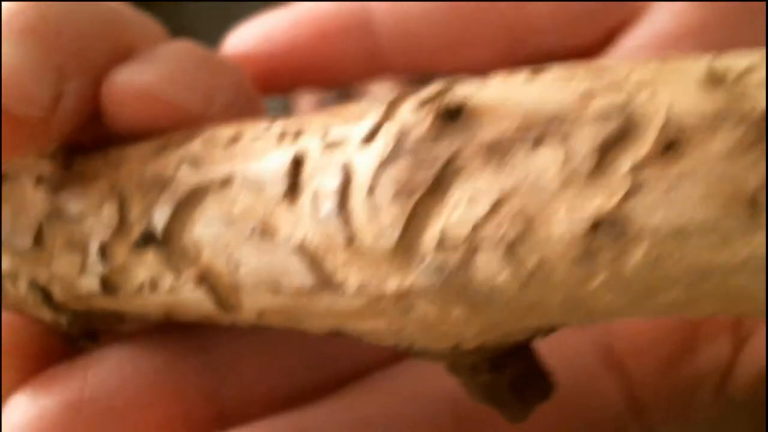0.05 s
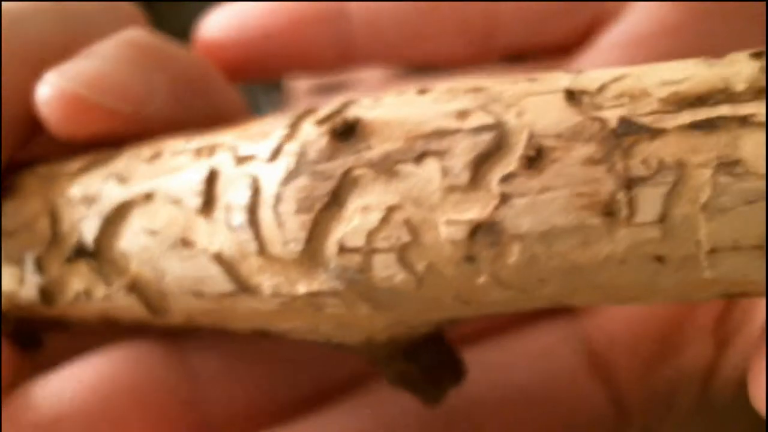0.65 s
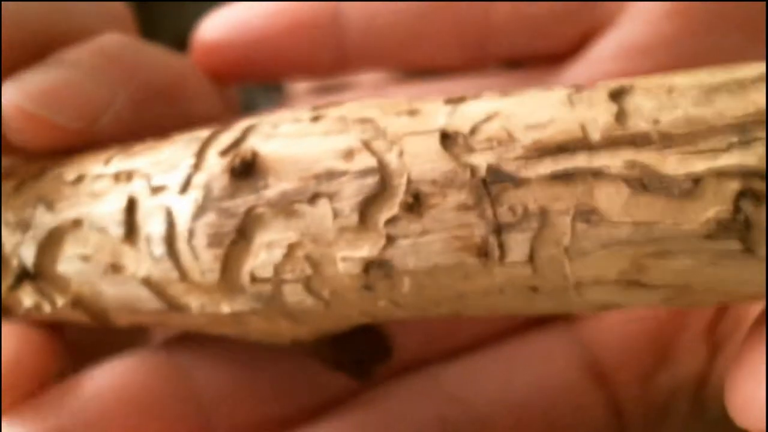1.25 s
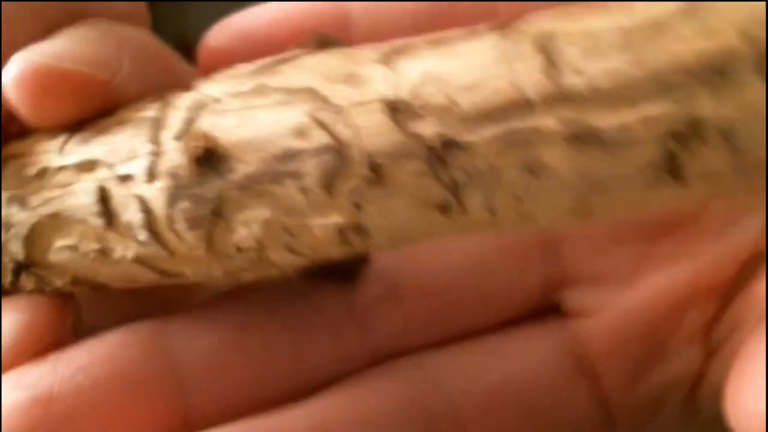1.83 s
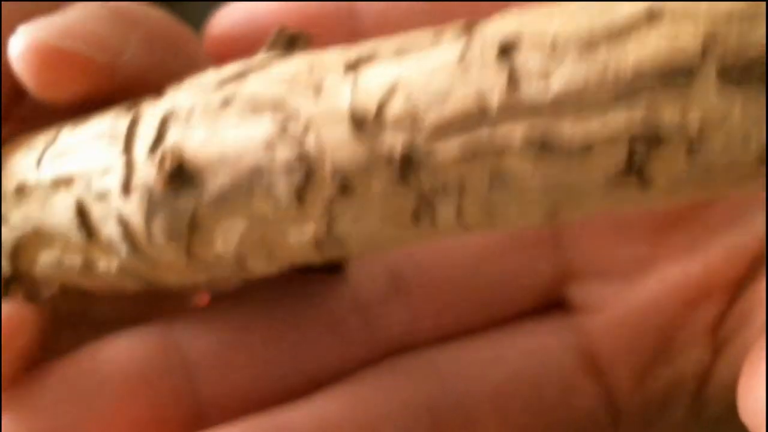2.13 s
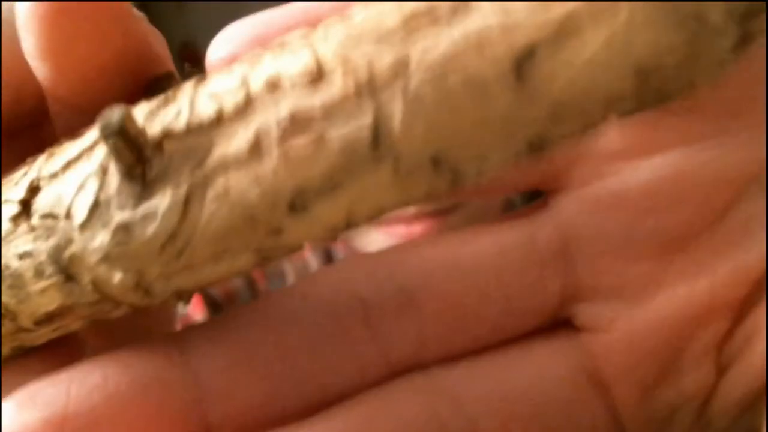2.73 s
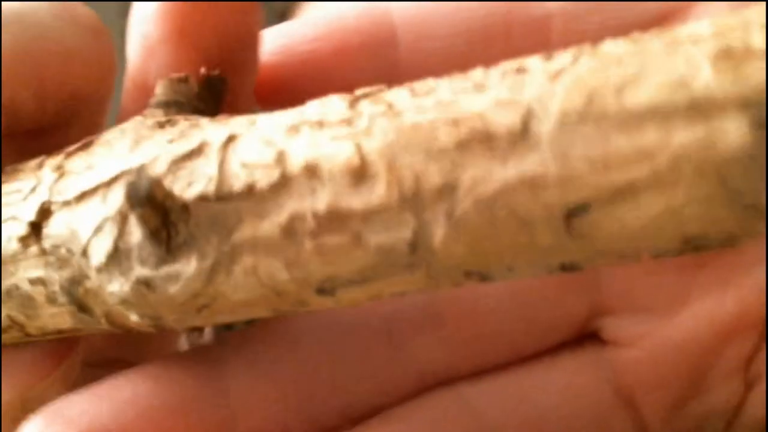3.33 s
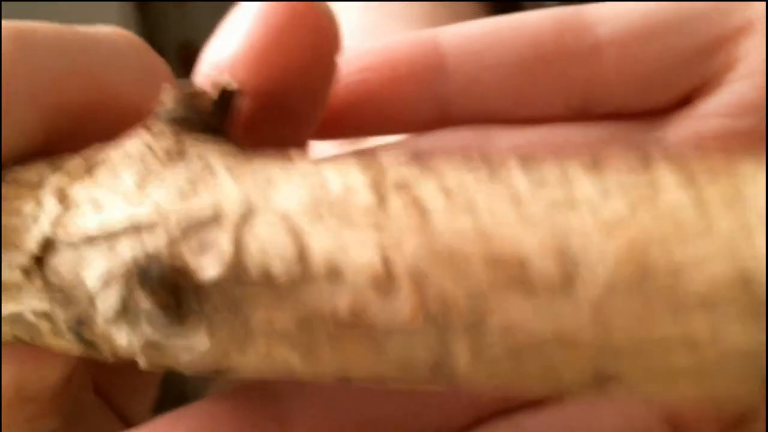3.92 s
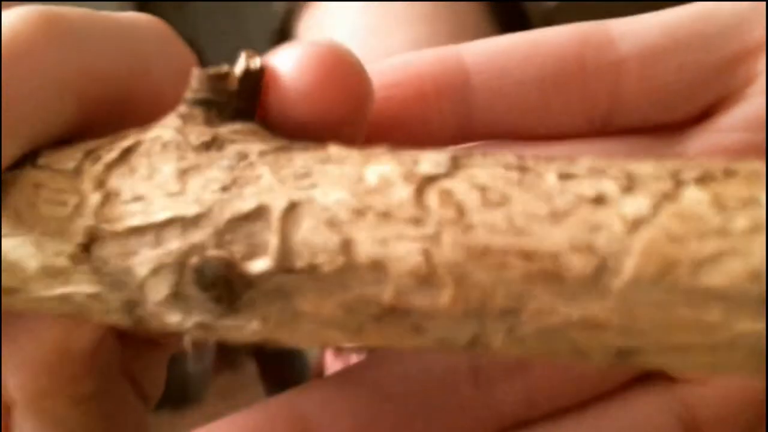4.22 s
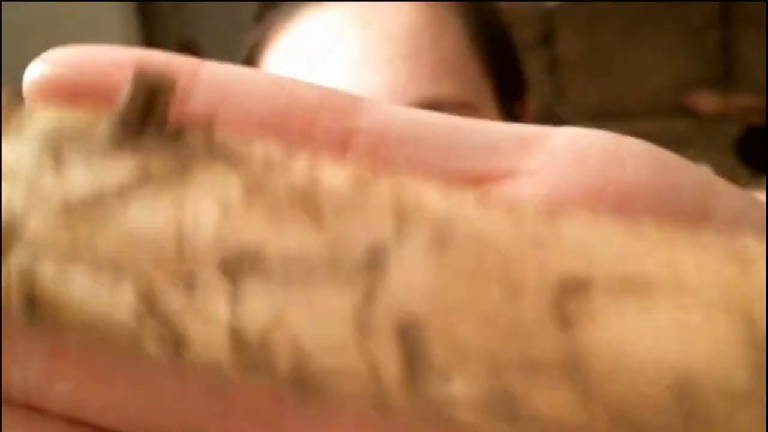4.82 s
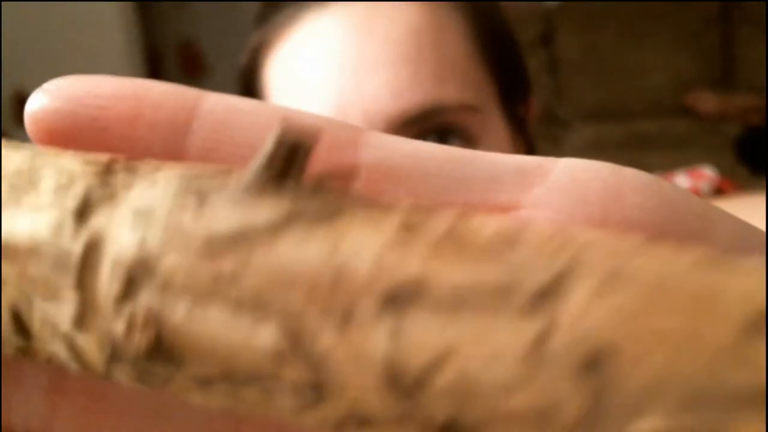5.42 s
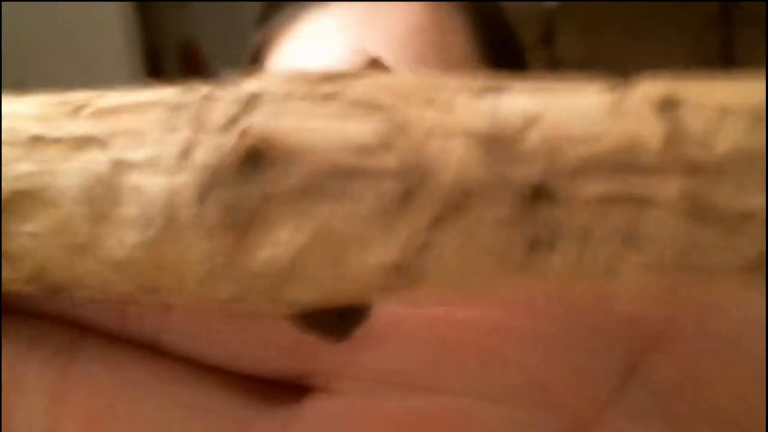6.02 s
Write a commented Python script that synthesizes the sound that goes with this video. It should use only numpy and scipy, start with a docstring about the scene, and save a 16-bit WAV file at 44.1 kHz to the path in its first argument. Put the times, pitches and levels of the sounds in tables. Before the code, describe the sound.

Hands turn a dry, weathered stick close to the microphone in a quiet room. Skin slides over the wood in faint, short, scratchy strokes, with soft finger bumps and barely audible squeaks. Two splinters snap near the start. A little before halfway comes one sharp, hollow knock. More tiny ticks follow, a fingernail briefly scrapes the grain, and a few firmer rubs finish over a low room hum.

```python
"""Hands turn a dry, weathered stick close to the microphone in a quiet room. From the start, sliding skin
hisses in short strokes and its friction rings the wood near 4 and 6 kHz, among soft finger bumps and runs of
faint stick-slip squeaks. Two splinters snap at about 0.5 s. At 2.6 s one sharp knock excites the modes of a
hollow body. More splinters tick as the turning goes on, a nail scrapes over the grain at 5.4 s, clicking as it
bites, and a few firm strokes end the scene."""
import sys
import numpy as np
from scipy import signal
from scipy.fft import rfft, irfft, next_fast_len
from scipy.io import wavfile

SR = 44100
rng = np.random.default_rng(int(sys.argv[2]) if len(sys.argv) > 2 else 0)


def unload_audio(sound):
    """Save the sound as a 16-bit wav file, at the path given as the first command line argument."""
    columns = np.transpose(np.atleast_2d(sound))
    # keep every value between -1 and 1, then stretch to whole-number steps
    steps = np.round(np.clip(columns, -1, 1) * 32767)
    wavfile.write(sys.argv[1], SR, steps.astype(np.int16))


N = 271656
T = np.arange(N) / SR

# wood resonances driven by sliding: (frequency [Hz], bandwidth [Hz], relative level [dB])
MAIN_RESONANCES = [(4021, 138, 1), (4220, 1500, -20)]
UPPER_RESONANCES = [(5650, 590, -8), (6284, 200, 7)]
LOW_RESONANCE = [(2250, 230, 0)]
# spectrum of the skin hiss: (frequency [Hz], relative density [dB])
HISS_SPECTRUM = [(3100, -6), (4600, -11), (7500, 9), (10200, 14), (11400, 3), (12800, -12), (15500, -26)]
def sliding():
    """Forced vibration: part of the skin's friction drives the wood's resonances, part radiates as hiss."""
    main, upper, hiss = stroke_gains()
    rub = friction(slips_per_s=5700, grain_db=4.5, patchy_db=1.5, smooth=1.0)
    grit = friction(slips_per_s=2500, grain_db=3.5, patchy_db=1.5, smooth=1.0)
    wood = from_db(-0.56) * main * resonate(rub, MAIN_RESONANCES)
    wood += from_db(-1.0) * upper * resonate(rub, UPPER_RESONANCES)
    wood += (from_db(-91.5) + from_db(-21.5) * upper) * resonate(rub, LOW_RESONANCE)
    firmness = np.cbrt(main * upper * hiss)   # a firm stroke also rasps between main and upper ring
    rasp = from_db(-10.0) * firmness * rms_one(band(grit, low_hz=3900, high_hz=5900))
    return wood + rasp + from_db(-3.0) * hiss * coloured(grit, HISS_SPECTRUM)


# strokes of skin: (start [s], length [s], main ring drive [dB], upper ring drive [dB], hiss drive [dB])
SKIN_STROKES = [ (0.134, 0.13, -73.5, -83.5, -85), (0.368, 0.038, -48.5, -61, -73),
                (0.409, 0.086, -53.5, -62.5, -69.5), (0.499, 0.052, -49.5, -56.5, -61.5),
                (0.776, 0.028, -69.5, -86, -88), (1.004, 0.053, -66.5, -68, -66),
                (1.057, 0.03, -72, -60.5, -67.5), (1.168, 0.04, -66.5, -62, -75),
                (1.257, .045, -64, -63.5, -74), (1.335, 0.071, -92, -80, -87), (1.603, 0.14, -62, -67, -77),
                (1.713, 0.12, -59, -56, -59.5), (1.837, 0.059, -52.5, -56.5, -58.5),
                (1.912, 0.055, -53, -60, -63.5), (1.969, 0.15, -62, -86, -82),
                (2.755, 0.056, -68.5, -85, -78), (2.818, .055, -86, -83, -69),
                (3.096, 0.059, -64.5, -94, -80), (3.192, 0.089, -64.5, -79, -64.5),
                (3.595, .11, -75, -81, -74), (3.993, 0.034, -74, -89, -67), (4.038, 0.031, -71.5, -81, -65),
                (4.089, 0.044, -63.5, -66.5, -60), (4.135, .04, -80, -70.5, -62),
                (4.798, 0.036, -56.5, -65.5, -72), (4.88, 0.29, -78, -79, -78.5),
                (4.983, 0.019, -62.5, -73, -86), (5.467, 0.072, -70, -90, -93),
                (5.798, 0.036, -68, -76, -80), (5.84, 0.042, -58, -60, -74),
                (5.907, 0.075, -61.5, -62.5, -67), (6.04, .12, -58, -61, -56)]
def stroke_gains():
    """Incoherent addition: overlapping strokes sum in power, for main ring, upper ring and hiss alike."""
    shapes = np.array([stroke(start, length) for start, length, *_ in SKIN_STROKES])
    gains = from_db([row[2:] for row in SKIN_STROKES])
    resting = from_db([-90.5, -94, -94])[:, None]   # the hands never quite rest
    catching = from_db(1.52 * drift(per_s=50))   # the dry surface catches unevenly
    return np.sqrt(gains.T ** 2 @ shapes ** 2 + resting ** 2) * catching


GRIP_S = 0.023   # rise time of a contact
def stroke(start, length, arch_db=1.5, release_t60=0.11):
    """Friction follows normal force: the finger takes hold, presses hardest midway, then lifts."""
    pressure = np.sin(np.pi * np.clip((T - start) / (length + GRIP_S), 0, 1))
    release = np.exp(-np.log(1000) * np.clip((T - start - length) / release_t60, 0, 10))
    return take_hold(start) * from_db(arch_db * (pressure - 1)) * release


def take_hold(start):
    """Gradual onset of contact: first a graze, then the full grip."""
    return .5 + .5 * np.tanh(2 * (T - start) / GRIP_S - 1)


KNOCK_S = 2.5709
# modes of the hollow body: (frequency [Hz], level [dB], t60 [s])
BODY_MODES = [(116, -46.5, 0.39), (160, -27, 0.13), (232.5, -24.5, 0.23), (315, -26, 0.063),
              (341, -29.5, .22), (423, -33, 0.47), (478, -33, 0.15), (545, -36, 0.39), (665, -33, 0.39),
              (755, -32, 0.25), (744, -39, 0.13), (882, -58, 0.24), (938, -50, .24), (960, -50, 0.42),
              (964, -48, 0.29), (1093, -38, 0.086), (1254, -39, 0.064)]
# its dense ringing tail: (low edge [Hz], high edge [Hz], level [dB], t60 [s], choked after [s])
BODY_TAIL = [(40, 260, -42.5, 0.21, 0.074), (180, 560, -24.5, 0.13, 0.017), (507, 925, -33, 0.41, 0.1),
             (1090, 2330, -47.5, 0.16, 0.068), (2500, 4400, -57, 0.13, .042),
             (4000, 5650, -54.5, 0.1, 0.063)]
def knock():
    """Impulse response of a hollow body: a steep thud, then low modes and their dense tail."""
    blow = impulse(KNOCK_S)
    thud = from_db(-20) * decay(KNOCK_S, t60=0.0013) + from_db(-19.5) * ring(blow, hz=400, t60=0.0064)
    # neighbouring modes swing in opposite directions
    body = sum((-1) ** k * from_db(db) * ring(blow, hz, t60)
               for k, (hz, db, t60) in enumerate(BODY_MODES))
    tail = 0
    for low, high, db, t60, after_s in BODY_TAIL:
        noise = rms_one(band(band(rng.standard_normal(N), low, high), low, high))
        tail += from_db(db) * decay(KNOCK_S, t60) * choke(after_s) * noise
    build_up = 1 - decay(KNOCK_S, t60=0.0048)
    return tail * build_up + body * choke(after_s=0.11) - thud


def choke(after_s):
    """Added damping smothers the knock's ring soon after the blow."""
    return 1 / (1 + (np.maximum(T - KNOCK_S, 0) / after_s) ** 6)


# splinters, and near 5.4 s the clicks of the nail as it bites: (time [s], drive [dB], cutoff [Hz], relative
# ring drive [dB], relative crumbling [dB])
SPLINTERS = [ (0.4311, -37, 7500, -5.5, -9), (0.5243, -22, 15000, -23, -21), (1.1873, -56, 9000, 5, -25),
             (3.3348, -30, 11500, -18, -14), (3.667, -23.5, 14100, -36, -30),
             (3.9758, -44.5, 12600, -24, -14), (4.135, -23.5, 10500, -38, -35),
             (4.1738, -48, 11000, -19, -17), (4.805, -41.5, 7000, 3, -6.5), (5.4018, -34.5, 9000, 6.5, -16),
             (5.42, -40, 8000, -1, -12), (5.8098, -26, 11500, -3, -23), (5.874, -48, 10000, 1, -9.5)]
# wood modes rung by a snap: (frequency [Hz], relative level [dB], t60 [s])
SNAP_MODES = [(2314, -19.5, 0.039), (4050, -16.5, 0.02), (6440, -19, .01)]
# spectrum of the crumbling: (frequency [Hz], relative density [dB])
CRUMB_SPECTRUM = [(2000, -38), (4500, -4.5), (7000, 4.5), (11000, 12.5), (13000, 10), (15500, 4)]
def splinters():
    """Brittle fracture: a splinter snaps in under a millisecond, rings the wood and crumbles briefly; the
    nail's clicks as it bites at 5.4 s sound the same way."""
    cracks, blows = np.zeros((2, N))
    crumbs = coloured(friction(slips_per_s=4000, grain_db=9.0, patchy_db=6.5, smooth=0.4), CRUMB_SPECTRUM)
    for s, db, cutoff_hz, ring_db, tail_db in SPLINTERS:
        snap = from_db(2) * band(band(impulse(s), 5000, 16000), 5000, 16000)
        crumble = crumbs * (from_db(-17) * decay(s, t60=0.0041) + from_db(tail_db) * decay(s, t60=0.062))
        low_pass = signal.butter(6, cutoff_hz, fs=SR, output="sos")
        cracks += from_db(db) * signal.sosfilt(low_pass, snap + crumble + 1e-18)
        blows += from_db(db + ring_db) * impulse(s)
    blows = band(blows, low_hz=1920, high_hz=9000)
    return cracks + sum(from_db(db) * ring(blows, hz, t60) for hz, db, t60 in SNAP_MODES)


# resonances under the nail: (frequency [Hz], bandwidth [Hz], relative level [dB])
NAIL_RESONANCES = [(2210, 82, -9), (3120, 570, -22), (4000, 114, -3.5), (5620, 210, -13.5),
                   (6300, 360, -17.5), (7400, 580, -19), (11000, 1400, -24), (13000, 900, -30)]
def nail_scrape(lands_s=5.364, peak_s=5.42, peak_db=-43, rise_db_per_s=333, fall_db_per_s=320):
    """Broadband excitation: a hard nail bites ever harder, wakes many resonances, then slides off."""
    to_peak_s = peak_s - T
    below_peak_db = np.clip(np.maximum(rise_db_per_s * to_peak_s, -fall_db_per_s * to_peak_s), 0, 200)
    rub = friction(slips_per_s=3800, grain_db=2.0, patchy_db=4.5, smooth=0.6)
    return take_hold(lands_s) * from_db(peak_db - below_peak_db) * resonate(rub, NAIL_RESONANCES)


# firmer bumps of the fingers: (time [s], drive [dB], frequency [Hz])
FIRM_BUMPS = [(0.17, -46, 293), (0.645, -45.5, 312), (1.104, -41.5, 169), (1.303, -43.5, 180),
              (1.503, -42.5, 160), (2.115, -52, 280), (2.202, -46.5, 248), (2.305, -43.5, 262),
              (2.79, -48, 200), (2.967, -43.5, 304), (3.092, -48.5, 202), (3.622, -50.5, 210),
              (3.695, -46.5, 229), (3.755, -47, 238), (4.806, -56, 112)]
def bumps(light_db=-58, low_hz=169, high_hz=320, until_s=4.8):
    """Damped oscillation: soft flesh presses for a few milliseconds and stills the stick within cycles."""
    # lighter bumps fall at random while the fingers walk round the stick
    light = [(when * until_s, light_db, low_hz + pitch * (high_hz - low_hz))
             for when, pitch in rng.random(size=(7, 2))]
    out = 0
    for s, db, hz in FIRM_BUMPS + light:
        envelope = decay(s, t60=0.044) - decay(s, t60=0.0089)
        out += from_db(db) * envelope * np.sin(2 * np.pi * hz * (T - s))
    return out


# runs of squeaks: (start [s], end [s], starting level [dB])
SQUEAK_TRAINS = [(0.032, 0.76, -63.5), (1.494, 1.83, -59.5), (4.179, 4.78, -60)]
# their resonances: (frequency [Hz], bandwidth [Hz], relative level [dB])
SQUEAK_RESONANCES = [(1213, 45, 13.5), (1700, 590, -37), (2086, 150, -7)]
def squeaks(period_s=.133, length_s=.019, growth_db_per_s=4):
    """Stick-slip friction drives a narrow resonance in evenly spaced bursts that grow through each run."""
    envelope = sum(from_db(db + growth_db_per_s * (s - start)) * swell(s, length_s)
                   for start, end, db in SQUEAK_TRAINS for s in np.arange(start, end, period_s))
    rub = friction(slips_per_s=1600, grain_db=1.0, patchy_db=0.5, smooth=0.26)
    return envelope * resonate(rub, SQUEAK_RESONANCES)


# brushes of a fingertip: (time [s], level [dB], centre frequency [Hz], length [s])
FINGERTIP_BRUSHES = [ (1.792, -73, 12400, .035), (2.835, -75, 2350, .038), (3.233, -75, 2350, .03),
                     (3.479, -81, 9650, .024), (3.859, -69, 11700, .011), (3.865, -63, 7850, 0.019),
                     (4.137, -72, 2370, 0.029), (4.362, -67.5, 6500, 0.014), (4.364, -69.5, 4000, 0.015),
                     (4.941, -68, 7840, .02), (5.265, -78, 10100, .035), (5.878, -64.5, 2330, .019)]
def brushes():
    """Narrow-band friction noise: each light touch gives a puff of hiss."""
    rub = friction(slips_per_s=2500, grain_db=9.0, patchy_db=-3.0, smooth=1.0)
    return sum(from_db(db) * swell(s, length) * rms_one(band(rub, 0.93 * hz, 1.073 * hz))
               for s, db, hz, length in FINGERTIP_BRUSHES)


# spectrum of the room noise: (frequency [Hz], relative density [dB])
ROOM_SPECTRUM = [(25, -47), (60, -8.5), (115, -1), (200, -1.5), (290, -0.5), (390, -5), (500, -10.5),
                 (930, -16), (1160, -13), (1550, -24), (2200, -24.5), (3000, -30), (5000, -33.5),
                 (15500, -36.5)]
# hum and a thin whine: (frequency [Hz], level [dB])
HUM_TONES = [(118.4, -77.5), (428, -75), (594, -82.5), (8000, -96)]
def room_tone():
    """Noise floor: a low, slightly restless continuous spectrum with faint tones of wandering phase."""
    air = from_db(-64.5) * coloured(rng.standard_normal(N), ROOM_SPECTRUM) * from_db(.5 * drift(25))
    hum = sum(np.sqrt(2) * from_db(db) * np.sin(2 * np.pi * hz * T + 0.74 * drift(6))
              for hz, db in HUM_TONES)
    return air + hum


def friction(slips_per_s, grain_db, patchy_db, smooth):
    """Shot noise: tiny uneven slips over a smooth hiss, clumped by the ridges of the wood."""
    sizes = from_db(grain_db * np.minimum(rng.exponential(1, N), 4)) * rng.choice([-1, 1], N)
    slips = rms_one(sizes * (rng.random(N) < slips_per_s / SR))
    return rms_one((slips + smooth * rng.standard_normal(N)) * from_db(patchy_db * drift(180)))


def resonate(x, resonances):
    """Parallel resonators of alternating sign, band-limited to darken the outer skirts; rms 1."""
    out = 0
    for k, (hz, width, db) in enumerate(resonances):
        radius = np.exp(-np.pi * width / SR)
        feedback = [1, -2 * radius * np.cos(2 * np.pi * hz / SR), radius ** 2]
        gain = (-1) ** k * from_db(db) * (1 - radius ** 2) / 2
        out += gain * signal.lfilter([1, 0, -1], feedback, x)
    return rms_one(band(out, .86 * resonances[0][0], 1.2 * resonances[-1][0]))


def ring(clicks, hz, t60):
    """Free vibration of one mode: a unit click starts a decaying sine of height 1."""
    radius, angle = 1000 ** (-1 / (t60 * SR)), 2 * np.pi * hz / SR
    return signal.lfilter([0, np.sin(angle)], [1, -2 * radius * np.cos(angle), radius ** 2], clicks + 1e-18)


def coloured(x, spectrum):
    """Spectral shaping by a smooth curve; rms 1."""
    hz, db = np.transpose(spectrum)
    size = next_fast_len(N)
    bins = np.maximum(np.arange(size // 2 + 1) * SR / size, 1)
    gain = from_db(np.interp(np.log(bins), np.log(hz), db))
    return rms_one(irfft(rfft(x, size) * gain, size)[:N])


def band(x, low_hz, high_hz):
    """Causal band-pass filtering."""
    return signal.sosfilt(signal.butter(2, [low_hz, high_hz], "band", fs=SR, output="sos"), x + 1e-18)


def impulse(s):
    """Unit impulse at time s."""
    return 1. * (np.arange(N) == round(s * SR))


def decay(start, t60):
    """Exponential decay from 1, by 60 dB in t60 seconds."""
    return (T >= start) * np.exp(-np.log(1000) * np.clip((T - start) / t60, 0, 10))


def swell(middle, length):
    """Gaussian envelope of a brief touch."""
    return np.exp(-np.minimum(2 * ((T - middle) / length) ** 2, 20))


def drift(per_s):
    """Random modulation: straight lines between values with a spread of 1."""
    steps = rng.standard_normal(N // 20)
    return np.interp(T * per_s, np.arange(len(steps)), steps)


def from_db(db):
    """Decibels to amplitude ratio."""
    return 10 ** (np.asarray(db) / 20)


def rms_one(x):
    """Normalisation to unit power."""
    return x / np.sqrt(np.mean(x ** 2) + 1e-20)


def scene():
    """Superposition: the close, dry sources add in one channel."""
    handling = sliding() + nail_scrape() + splinters() + brushes() + squeaks() + bumps()
    return (handling + knock() + room_tone())[None]


def record(dry, cutoff_hz=15800):
    """Band limiting: a steep low-pass cuts the highest treble."""
    return signal.sosfilt(signal.ellip(10, .1, 70, cutoff_hz, fs=SR, output="sos"), dry)


dry = scene()
out = record(dry)
unload_audio(out)
```